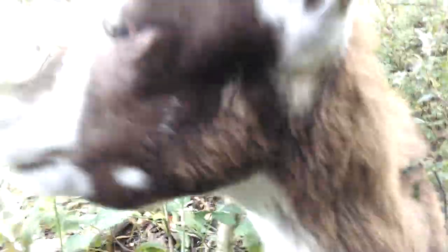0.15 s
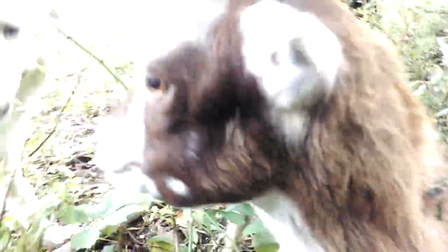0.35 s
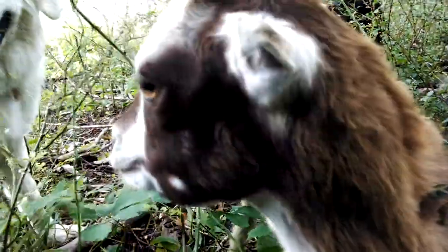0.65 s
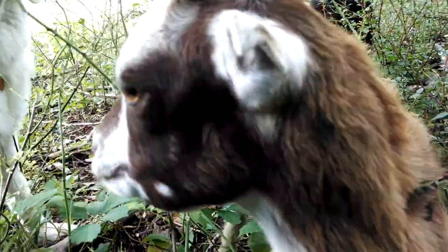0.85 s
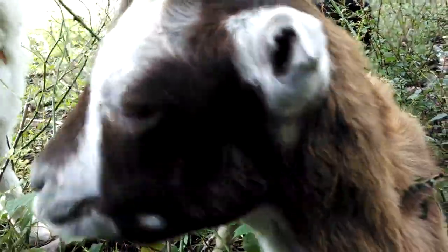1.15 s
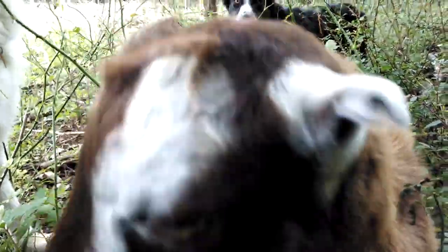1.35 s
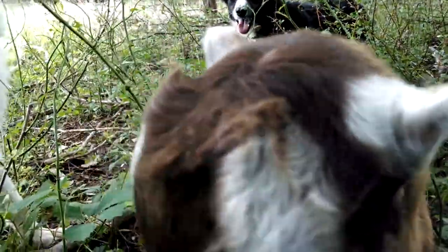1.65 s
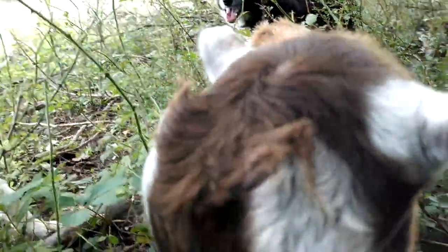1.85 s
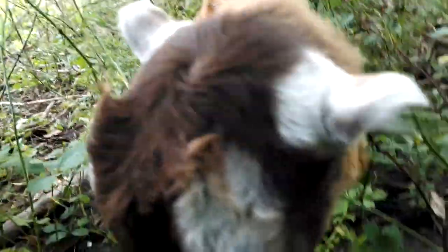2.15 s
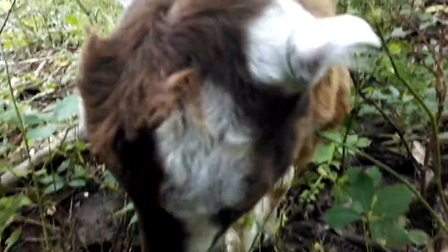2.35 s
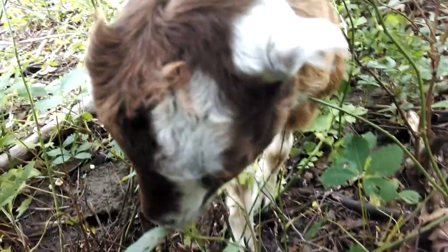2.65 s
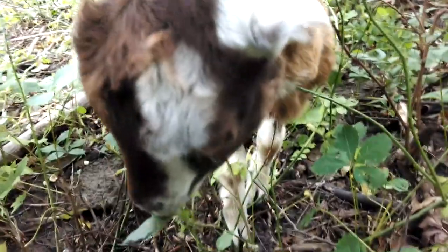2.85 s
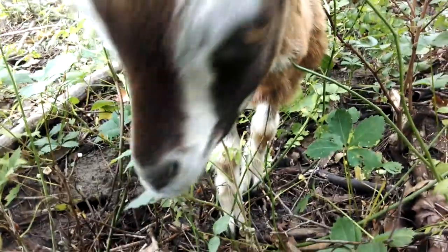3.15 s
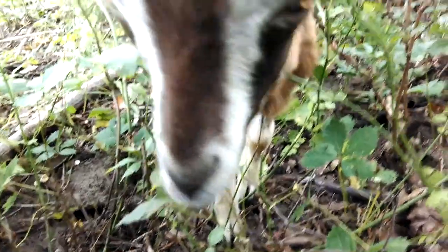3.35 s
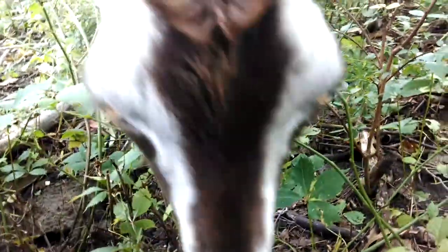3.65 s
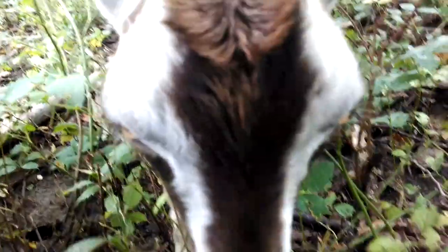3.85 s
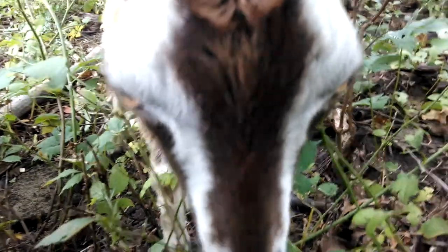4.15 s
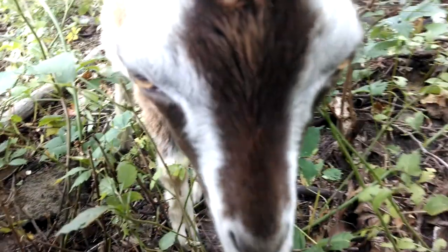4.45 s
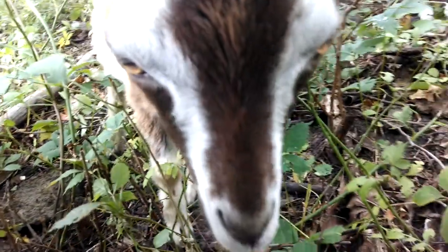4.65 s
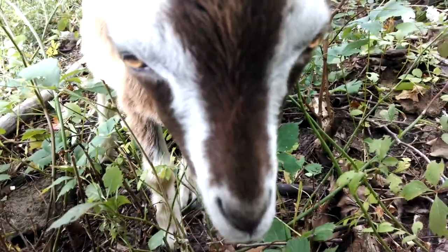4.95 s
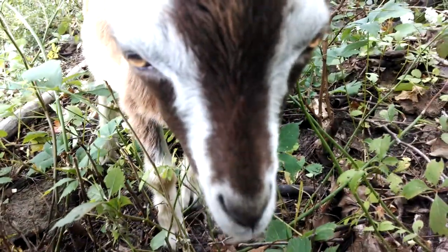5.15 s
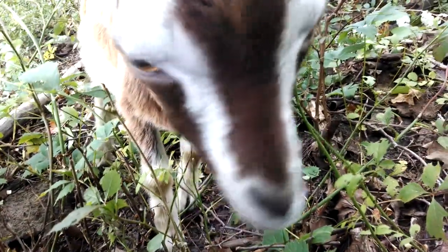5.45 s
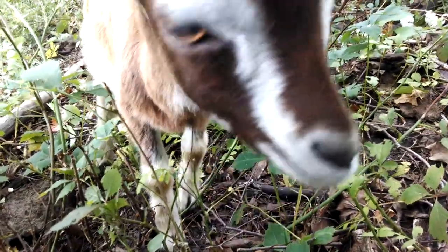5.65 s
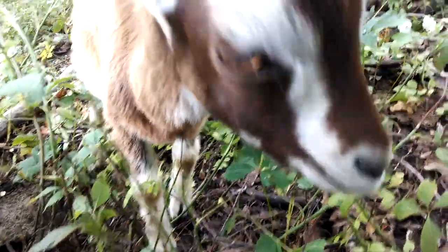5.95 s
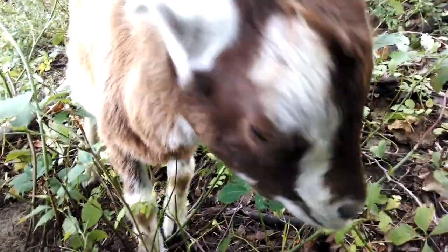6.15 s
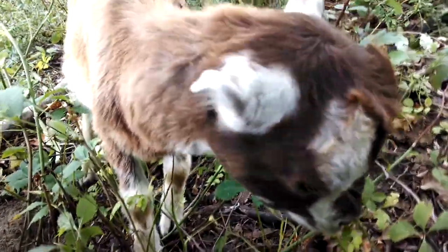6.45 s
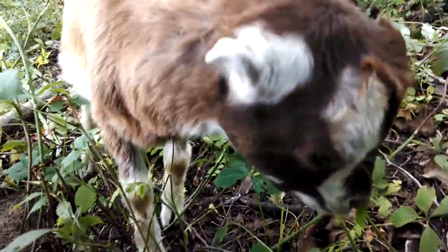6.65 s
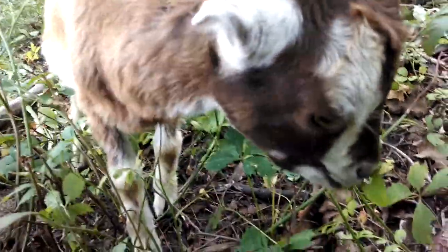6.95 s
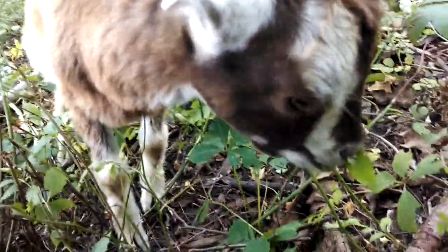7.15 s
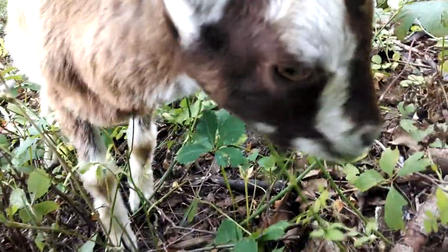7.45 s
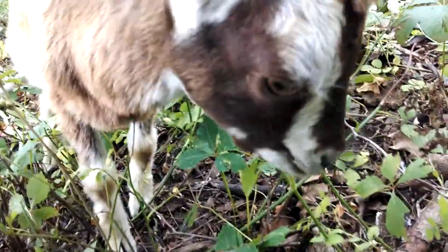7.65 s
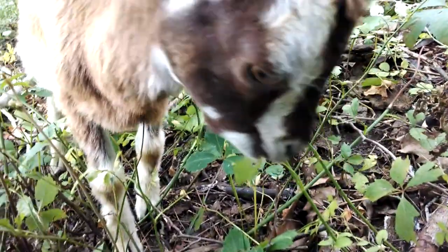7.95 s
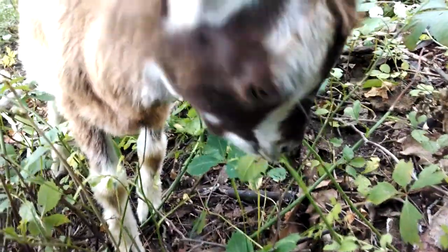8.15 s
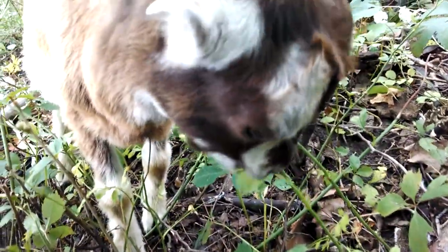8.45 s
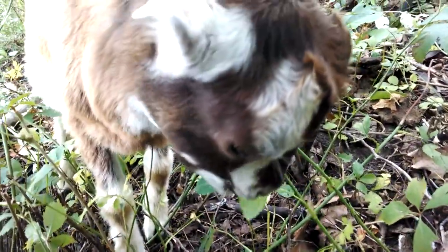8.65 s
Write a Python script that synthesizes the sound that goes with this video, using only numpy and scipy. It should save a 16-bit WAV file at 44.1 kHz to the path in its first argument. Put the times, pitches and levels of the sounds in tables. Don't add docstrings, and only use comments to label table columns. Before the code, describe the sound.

A young goat browses in undergrowth with sharp twig cracks and dry leaf rustles while a dog pants nearby, collar tags clink, and crickets trill steadily.

```python
import sys
import numpy as np
from scipy import signal
from scipy.fft import rfft, irfft, next_fast_len
from scipy.io import wavfile
from scipy.ndimage import uniform_filter1d, map_coordinates

SR = 44100
rng = np.random.default_rng(int(sys.argv[2]) if len(sys.argv) > 2 else 0)


def output_pcm(signal):
    pcm = np.clip(np.atleast_2d(signal).T, -1, 1) * 32767
    wavfile.write(sys.argv[1], SR, np.round(pcm).astype(np.int16))


def linear_from_db(decibels):
    return 10 ** (np.asarray(decibels, float) / 20)


N = 388521
PORT_SIGNS = np.array([[.5], [-.5]])

# [t/s, peak level/dB, left-right/dB, knock level/dB, knock f/Hz]
SNAPS = [(1.5469, -37, -8, -19, 1250), (1.904, -30, -5, -14, 1490), (2.0635, -34.5, -18.5, -3, 2060),
         (2.208, -43, -14, 6, 1700), (2.207, -21, -15.5, 6.5, 1360), (2.276, -43, -10, -11, 1150),
         (2.3263, -42, -1.5, 14, 2600), (2.418, -41.5, -8, -12, 1270), (2.4329, -39.5, -19, 3.5, 950),
         (3.1993, -44, -3, 0, 1750), (3.2165, -50, -4, -15, 1680), (3.289, -53, -4.5, 2, 1200),
         (3.3471, -40, -17, -5.5, 850), (3.3713, -43, 12, -21, 1160), (3.6107, -47, -4, -4, 1190),
         (3.864, -54, -25, -8.5, 1040), (4.39, -46, 1, -1, 902), (4.403, -46, -17, -4, 790),
         (4.736, -46.5, -4.5, 2.5, 960), (4.8302, -45, -10, -9, 1520), (5.1628, -31.5, -4, -6.5, 1470),
         (5.9355, -61, 10, 3, 1340), (7.1713, -44.5, -8, -9, 980), (7.477, -24.5, -13, -19.5, 1050),
         (8.0336, -42, 0, -7, 1040)]
# [t/s, peak level/dB, left-right/dB, brightness/dB per octave]
LEAF_TICKS = [(0.068, -36, -8, 0), (0.3544, -35, -4, -3), (0.462, -33.5, -7, -1), (1.029, -47, -6, 0),
              (1.51, -28, -9, 3), (1.738, -43, -6, 3.5), (1.8457, -38, -7.5, 2), (1.864, -32, -10, 5),
              (1.875, -33, -7.5, 4), (1.9295, -39, -5, -7), (2.2935, -40, -6, -8), (2.6065, -45.5, -21, -1),
              (2.9467, -50, 3.5, 2), (3.0026, -48, -7.5, 11), (3.1303, -43, -7, 3), (3.2201, -33, -4.5, 6),
              (3.3169, -37, -11, 5), (3.394, -44, -5, 2), (3.4451, -49, -8, 2), (3.637, -35, -5.5, 7),
              (3.655, -34, -5, 6), (3.7414, -44, -4.5, 2), (3.8092, -41, -8, 5), (3.9624, -45, -4, 2),
              (4.2887, -47, -5.5, 2), (7.3989, -32, -12, 1), (7.416, -34, -13, 1), (7.469, -38, -1, -3),
              (7.5165, -35, -7, 1), (7.5618, -47, -5.5, 3), (7.798, -32.5, -10, -2), (7.805, -38, -6, 3),
              (7.896, -35, -6, 5), (8.1265, -49, -3.5, 2), (8.503, -40, -5, 1), (8.5914, -46, -5.5, 2),
              (8.7945, -35, -9, 3)]
# [f/Hz, density/dB per Hz]
CRACK_SPECTRUM = [(1000, -36), (3000, 0), (6000, 7), (11000, -0.5), (14000, -4.5), (16500, -4)]
# [f/Hz, width/Hz, level/dB]
STEM_MODES = [(394, 210, -2), (1245, 430, 2.5), (2060, 910, -2.5), (3950, 860, -7.5), (6430, 720, -12)]
# [t/s, level/dB]
BRUSH_EFFORT = [(0.0, -89), (1.15, -58), (1.49, -64), (1.72, -53), (2.06, -49), (2.26, -38), (2.87, -49),
                (3.43, -46), (3.93, -40), (4.93, -50), (5.5, -46), (6.16, -84), (6.58, -41), (7.24, -41.5),
                (8.02, -42), (8.81, -51)]
# [t/s, level/dB, half length/s]
SWISHES = [(.46, -49, .02), (1.72, -59, 0.043), (1.896, -53, 0.095), (2.44, -45, 0.044),
           (2.835, -53, 0.039), (3.008, -59, 0.037), (3.128, -53, 0.073), (3.229, -46, 0.017),
           (3.351, -44, 0.017), (3.653, -48, 0.026), (3.823, -55.5, 0.041), (3.887, -55, 0.029),
           (4.04, -61, 0.053), (5.556, -53, 0.033), (7.192, -45, 0.022), (7.517, -53, 0.049),
           (7.81, -47.5, 0.055), (7.908, -48, 0.034), (8.26, -71, .04), (8.54, -55, 0.045)]
# [f/Hz, density/dB per Hz]
LEAF_SPECTRUM = [(1000, -28), (3000, -2), (6000, 1), (10000, -6.5), (13000, -8), (15300, 0.5), (16500, 2)]
# [t/s, peak level/dB, f/Hz, left-right/dB]
THUMPS = [(1.106, -50, 51.1, -11), (1.356, -52.5, 186, -6), (2.065, -57.5, 72, -19),
          (2.209, -36, 300, -14.5), (2.433, -46.5, 111, -13), (2.87, -61, 145, -21),
          (3.149, -56, 59.2, -14), (3.396, -44.5, 100, -6), (4.004, -60, 64.6, -11), (5.679, -65, 116, -7),
          (6.501, -51, 51.1, -5), (7.198, -56, 66, -3), (7.474, -55.5, 223, -6), (7.788, -61, 90, 4)]
# [t/s, peak level/dB, mouth f/Hz, brightness/dB]
PANTS = [(0.043, -56.5, 453, 5), (0.144, -51, 430, 1.5), (0.258, -46.5, 296, -2.5),
         (0.324, -44.5, 323, -17), (0.413, -53.5, 418, -1), (0.499, -50.5, 310, -4), (0.631, -52, 448, -1),
         (0.768, -44.5, 416, -5), (0.89, -50.5, 440, -8), (1.055, -46, 390, -5.5), (1.182, -47, 438, -6.5),
         (1.33, -44.5, 428, -4.5), (1.44, -43, 427, -10.5), (1.604, -44.5, 420, -2.5),
         (1.734, -52.5, 440, 2), (1.871, -44, 290, -6), (1.99, -55, 382, -5), (2.145, -48, 408, 0.5),
         (2.24, -48.5, 425, 11.5), (2.381, -41.5, 423, -7.5), (2.68, -49.5, 330, -3.5),
         (2.914, -51, 338, -1.5), (3.196, -49, 314, -4.5), (3.442, -50.5, 342, -3), (3.65, -59, 480, 6.5),
         (3.716, -51, 330, -5), (3.954, -52, 317, -1.5), (4.025, -43, 290, -16), (4.378, -55.5, 267, -13)]
# [t/s, peak level/dB]
SIGHS = [
    (4.601, -62),
    (5.242, -65),
    (5.503, -53.5),
    (5.732, -58),
    (6.151, -55.5),
    (6.277, -56),
    (6.899, -54.5),
    (7.768, -55),
    (8.031, -60),
    (8.182, -56),
]
# [f/Hz, width/Hz, level/dB]
THROAT_MODES = [(725, 36, 10), (1101, 95, 3.5), (1520, 170, 4.5), (2260, 370, 1), (3620, 1260, -1.5)]
# [t/s, peak level/dB, middle modes level/dB, low modes level/dB, freedom to ring/0-1]
CLINKS = [(6.445, -55, -19, -6, 0.6), (6.4707, -35, -32, -14.5, 0.42), (6.5515, -19.5, -7, 7, 0.84),
          (6.5581, -19, -18, 1, 0.96), (6.6235, -28, -16.5, -19, 0.37), (6.627, -23, -21, -15, 0.3),
          (6.6614, -42, -12, -2.5, 0.5), (6.7296, -41, -21, -14.5, 0.81), (6.797, -40, -21, -14, 0.4),
          (6.8299, -15, -9, 5, 0.54), (6.8358, -22.5, -4, 4, 1), (7.0908, -36, -26, -21, 0.41)]
# [f/Hz, level/dB, t60/s]
TAG_HIGH_MODES = [(14390, -8, .06), (14430, -13, .16), (14490, -17, .2), (14710, -9, .28),
                  (14800, -14, .15)]
TAG_MID_MODES = [(9250, -3, .015), (10000, -5, .012), (11640, -12, .1), (11755, -5, .18), (11850, -5, .25)]
TAG_LOW_MODES = [(4200, -19, .02), (6090, -15, .045), (6400, -3, .013), (6740, -15, .35), (6850, 1, .01)]
# [t/s, level/dB, left-right/dB, left phase lead/rad]
NEAR_CRICKET = [(0, -54, -2.5, -3), (.15, -59, -3, 0), (.4, -51, -2, -1), (1, -53.5, -3, 0),
                (1.3, -49.5, 0, -0.5), (1.5, -52.5, 8, 1.5), (1.7, -49, 1, -0.9), (1.95, -51, 3, -2),
                (2.7, -56, 9, -0.5), (3.55, -58.5, 5, -1.5), (4.05, -51, 9, -3), (4.25, -53.5, -1, -2),
                (5.5, -51, 4, -4), (6, -53.5, 0, -2), (6.5, -55.5, 5, -3.5), (7, -46.5, -1, -2),
                (7.45, -46.5, -0.5, -1.6), (8.81, -46.5, -1.5, -2)]
# [t/s, level/dB]
FAR_CRICKET = [(0, -75), (2.8, -75), (3.1, -63), (3.7, -61), (3.8, -52), (4.62, -57.5), (4.7, -64),
               (5.3, -57), (5.7, -62), (6.3, -60.5), (7.2, -56), (8.81, -65)]
# [f/Hz, density/dB per Hz]
CHORUS_SPECTRUM = [(2500, -22.5), (3500, -9.5), (4300, -10), (5500, -7.5), (6400, -14), (7000, -2),
                   (8300, 0.5), (8900, -9), (9600, -27), (11000, -44)]
# [t/s, level/dB]
GUSTS = [(0.1, -59), (0.71, -54.5), (1.08, -60.5), (1.54, -58.5), (2.06, -52), (3.02, -58.5), (4.17, -57),
         (5.0, -63), (5.35, -57.5), (5.74, -63.5), (6.35, -55.5), (6.65, -62.5), (7.2, -58), (7.7, -60),
         (8.34, -55.5), (8.81, -62.5)]
# [f/Hz, density/dB per Hz]
BREEZE_SPECTRUM = [(20, 9.5), (60, 10), (150, -1), (350, -2), (700, -11), (1200, -18.5), (2500, -22),
                   (5000, -23)]
# [f/Hz, density/dB per Hz]
HISS_SPECTRUM = [(20, 8.5), (1000, -3.5), (2500, -5), (4000, -5.5), (10000, -10), (13500, -15), (16000, -5)]
# [f/Hz, correlation/-1..1]
PORT_LIKENESS = [(100, 0.68), (500, 0.54), (1500, 0.018), (4000, 0.18), (16000, 0)]
# [f/Hz, share/0-1]
CROSS_FEED = [(100, 0.9), (1300, 0.6), (2600, 0.69), (4000, 0.11), (5400, 0.54), (6600, 0.5), (10700, 0.19),
              (16000, 0.24)]
# [f/Hz, level/dB]
RIGHT_PORT = [(1000, -0.5), (7000, 1), (10000, 5.5), (16000, 6.5)]


def along(points, hz):
    f, v = np.transpose(points)
    return np.interp(np.log(hz + 1), np.log(f + 1), v)


def unit(x):
    return x / np.sqrt(np.mean(x ** 2) + 1e-20)


def curves(rows):
    s, *cols = np.transpose(rows)
    return [np.interp(np.arange(N) / SR, s, c) for c in cols]


def wobble(rate_hz):
    knots = rng.standard_normal(int(N * rate_hz / SR) + 4)
    return map_coordinates(knots, [np.arange(N) * rate_hz / SR])


def filtered(x, response):
    n = x.shape[-1]
    m = next_fast_len(n + 4096)
    return irfft(rfft(x, m) * response(np.fft.rfftfreq(m, 1 / SR)), m)[..., :n]


def resonant(modes):
    def response(f):
        return sum((-1) ** k * linear_from_db(db) * 1j * f * width / (hz * hz - f * f + 1j * f * width)
                   for k, (hz, width, db) in enumerate(modes))
    return response


def placed(x, pan_db, lead_s):
    return linear_from_db(PORT_SIGNS * pan_db) * filtered(x, lambda hz: np.exp(2j * np.pi * hz * PORT_SIGNS * lead_s))


def diffuse(spectrum, patchy_db, lead_s):
    z = signal.stft(rng.standard_normal((2, N)), nperseg=512)[2]
    field = uniform_filter1d(rng.standard_normal(z.shape[1:]), size=6, axis=0)
    field = uniform_filter1d(field, size=12, axis=1)
    pair = signal.istft(z * linear_from_db(patchy_db * unit(field)), nperseg=512)[1][:, :N]

    def mid_side(hz):
        angle = np.arccos(np.clip(along(PORT_LIKENESS, hz), -1, 1)) / 2
        return linear_from_db(along(spectrum, hz)) * [np.cos(angle), np.sin(angle)]
    mid, side = filtered(pair, mid_side)
    ports = np.array([mid + side, mid - side])
    return unit(placed(ports, 0, lead_s) if lead_s else ports)


def scattered(x, db, t60):
    t = np.arange(SR // 6) / SR
    tail = rng.standard_normal((2, len(t))) * linear_from_db(-60 * t / t60)
    return x + linear_from_db(db) * signal.fftconvolve(x, tail / np.linalg.norm(tail[0]), axes=1)[:, :N]


def add(track, s, sound):
    spot = track[:, round(s * SR):][:, :sound.shape[1]]
    spot += sound[:, :spot.shape[1]]


def snaps():
    out, t = np.zeros((2, N)), np.arange(SR // 16) / SR
    twig_tilt_db = -1.5
    leaf_knock_db, leaf_knock_hz = -22.5, 1380
    events = [(*snap, twig_tilt_db) for snap in SNAPS]
    events += [(s, db, pan_db, leaf_knock_db, leaf_knock_hz, tilt_db) for s, db, pan_db, tilt_db in LEAF_TICKS]
    for s, db, pan_db, knock_db, knock_hz, tilt_db in events:
        stem = lambda hz: resonant(STEM_MODES)(hz * 1350 / knock_hz)
        knock = filtered(np.exp(-t / 6e-5), stem)
        knock = knock / np.abs(knock).max()
        burst = rng.standard_normal((2, len(t)))
        split = burst[0] * linear_from_db(-60 * t / 0.004) * (1 - np.exp(-t / 0.00016))
        splinters = linear_from_db(-30 - 60 * t / 0.045) * burst
        colour = lambda hz: linear_from_db(along(CRACK_SPECTRUM, hz) + tilt_db * np.log2((hz + 500) / 8000))
        crack = filtered(split + splinters, colour)
        crack = 0.75 * crack / np.abs(crack).max()
        echoes = linear_from_db(-28.5 - 60 * t / 0.24) * unit(filtered(burst, stem))
        sound = linear_from_db(db + 4) * crack + linear_from_db(db + knock_db + 4) * (knock + echoes)
        sound = np.pad(sound, ((0, 0), (44, 0)))
        aside_db = pan_db + 5
        add(out, s, placed(sound, 1.82 * aside_db, 5e-6 * aside_db))
    return out


def rustle():
    grains_per_s = 700
    heights = linear_from_db(3.5 * np.minimum(rng.exponential(size=N), 2.6))
    spikes = (rng.random(N) < grains_per_s / SR) * heights * rng.standard_normal(N)
    grains = unit(filtered(spikes, lambda hz: linear_from_db(along(LEAF_SPECTRUM, hz))))
    grains = placed(grains, pan_db=-2.0, lead_s=-0.00003)
    fizz = diffuse(LEAF_SPECTRUM, patchy_db=1.0, lead_s=0)
    t = np.arange(N) / SR
    effort = linear_from_db(curves(BRUSH_EFFORT)[0] - 12.0)
    effort = effort + sum(linear_from_db(db) * np.exp(-((t - s) / half_s) ** 2) for s, db, half_s in SWISHES)
    return effort * linear_from_db(1.04 * wobble(30)) * (0.26 * grains + fizz)


def thumps():
    out, t = np.zeros((2, N)), np.arange(SR // 8) / SR
    for s, db, hz, pan_db in THUMPS:
        push = np.sin(2 * np.pi * hz * t) * np.exp(-t * hz / 0.6)
        add(out, s, linear_from_db(db + 18.0 + PORT_SIGNS * pan_db) * push)
    return out


def panting():
    out, t = np.zeros((2, N)), np.arange(SR // 4) / SR
    sigh_mouth_hz, sigh_bright_db = 382, -4.5
    breaths = PANTS + [(*sigh, sigh_mouth_hz, sigh_bright_db) for sigh in SIGHS]
    for s, db, mouth_hz, bright_db in breaths:
        length_s = 0.073 * np.exp(0.12 * rng.normal())
        stretch = 0.99 - 0.0074 * s + 0.063 * rng.normal()
        flow = rng.standard_normal((2, len(t)))
        uneven_db = 2 * rng.standard_normal(len(t) // 200 + 1).repeat(200)[:len(t)]
        flow = (flow[0] + 0.47 * flow) * linear_from_db(uneven_db)
        mouth = filtered(flow, resonant([(mouth_hz, 75, 0)]))
        mouth = unit(filtered(mouth, resonant([(mouth_hz, 300, 0)])))
        throat = unit(filtered(flow, lambda hz: resonant(THROAT_MODES)(hz * stretch)))
        onset = 1 - np.exp(-t / 0.0029)
        shape = onset / (1 + np.exp(np.clip((t - length_s) / 0.01, -30, 30)))
        add(out, s, linear_from_db(db - 4.0) * shape * (mouth + linear_from_db(bright_db) * throat))
    return placed(out, pan_db=1.5, lead_s=1e-4)


def tags():
    out, t = np.zeros((1, N)), np.arange(SR // 4) / SR
    chokes_s, choke_db = (6.625, 6.878, 9), 6

    def ring(modes, free):
        total = 0
        for hz, level_db, t60 in modes:
            decay = linear_from_db(level_db + 1.5 * rng.normal() - 60 * t / (free * t60))
            sway = np.cumsum(rng.standard_normal(len(t))) * 0.039
            total = total + decay * np.sin(2 * np.pi * hz * t + sway)
        return total

    for s, db, mid_db, low_db, free in CLINKS:
        tick = filtered(rng.standard_normal(len(t)), resonant([(6500, 960, 13), (9600, 10300, -3.5)]))
        tick = tick * (linear_from_db(low_db - 1.5 - 60 * t / 0.012) + linear_from_db(low_db - 19 - 60 * t / 0.17))
        plate = ring(TAG_HIGH_MODES, free) + linear_from_db(mid_db) * ring(TAG_MID_MODES, free)
        plate = plate + linear_from_db(low_db) * ring(TAG_LOW_MODES, free)
        next_choke_s = min(c for c in chokes_s if c > s)
        plate = plate * linear_from_db(-choke_db * np.clip((s + t - next_choke_s) / .004, 0, 1))
        add(out, s, linear_from_db(db - 8.0) * ((1 - np.exp(-t / 0.00024)) * plate + tick)[None])
    return scattered(placed(out, pan_db=-10, lead_s=2e-5), db=-23, t60=0.38)


def trill(rate_hz, lead_cycles, turn_rad, hz, sweep_hz, duty, rough):
    cycle = (rate_hz * np.arange(N) / SR + lead_cycles + duty / 2) % 1 / duty
    stroke = np.clip(cycle, 0, 1)
    swell = np.sin(np.pi * stroke) ** 0.28 * linear_from_db(0.26 * wobble(rate_hz))
    pitch_hz = hz + sweep_hz * (.5 - stroke) + 20 * wobble(rate_hz)
    teeth = 1 + rough * wobble(970)
    phase = 2 * np.pi * np.cumsum(pitch_hz) / SR
    return unit(swell * teeth * np.sin(phase + PORT_SIGNS * turn_rad))


def crickets():
    near_db, pan_db, turn_rad = curves(NEAR_CRICKET)
    far_db = curves(FAR_CRICKET)[0]
    lead_cycles = 0.1 - 0.0099 * np.arange(N) / SR
    near = trill(41.5, lead_cycles, turn_rad, hz=7080, sweep_hz=230, duty=.44, rough=.1)
    far = trill(48.4, 0, -.5, hz=7630, sweep_hz=330, duty=.6, rough=.6)
    both = linear_from_db(near_db - 1.0 + PORT_SIGNS * pan_db) * near + linear_from_db(far_db + 2) * far
    return scattered(both, db=-10.0, t60=0.087)


def air():
    chorus = linear_from_db(-47 + 0.61 * wobble(16)) * diffuse(CHORUS_SPECTRUM, patchy_db=0.7, lead_s=0)
    breeze_level = linear_from_db(curves(GUSTS)[0] + 7.0 + 1.35 * wobble(5.6))
    breeze = breeze_level * diffuse(BREEZE_SPECTRUM, patchy_db=2.5, lead_s=0.00026)
    hiss = linear_from_db(-59.5) * diffuse(HISS_SPECTRUM, patchy_db=4.5, lead_s=0)
    return chorus + breeze + hiss


def scene():
    return snaps() + rustle() + thumps() + panting() + tags() + crickets() + air()


def duck(x, threshold_db, ratio, release_db_per_s):
    level_db = 10 * np.log10(np.abs(uniform_filter1d(np.mean(x ** 2, 0), size=441)) + 1e-12)
    climb_db = release_db_per_s * np.arange(N) / SR
    wanted_db = -ratio * np.maximum(level_db - threshold_db, 0)
    gain_db = climb_db + np.minimum.accumulate(wanted_db - climb_db)
    late_db = np.pad(gain_db, (900, 0), "edge")[:N]
    return x * linear_from_db(uniform_filter1d(late_db, size=900))


def band_limit(x):
    return signal.sosfilt(signal.butter(12, 16810, fs=SR, output="sos"), x)


def record(dry):
    top_hz = 15550
    ports = filtered(dry, lambda hz: linear_from_db([0 * hz, along(RIGHT_PORT, hz)] - 28 * (hz > top_hz)))
    late = lambda hz: np.exp(-2j * np.pi * hz / 2720 - .35j * hz / (hz + 800))
    across = filtered(ports[::-1], lambda hz: np.clip(along(CROSS_FEED, hz), 0, 1) * late(hz))
    wide = duck(ports - across, threshold_db=-34, ratio=0.39, release_db_per_s=8.5)
    mix = np.clip(wide, -1, 1)
    return band_limit(mix)


dry = scene()
out = record(dry)
output_pcm(out)
```